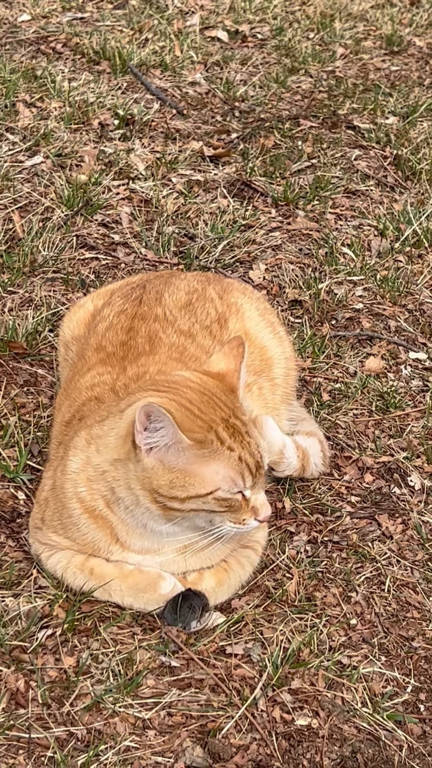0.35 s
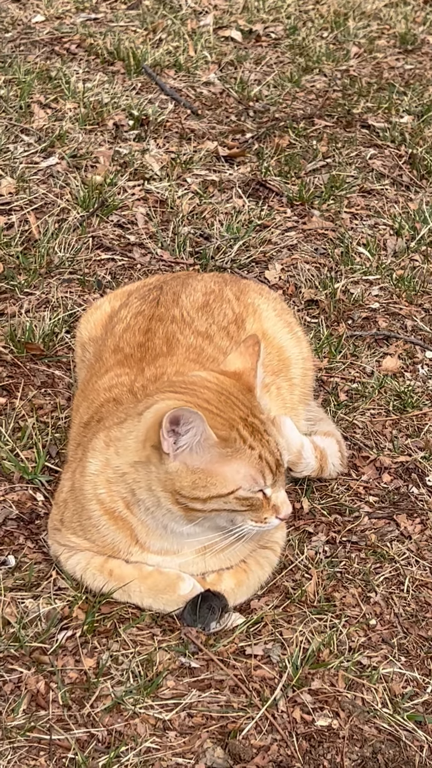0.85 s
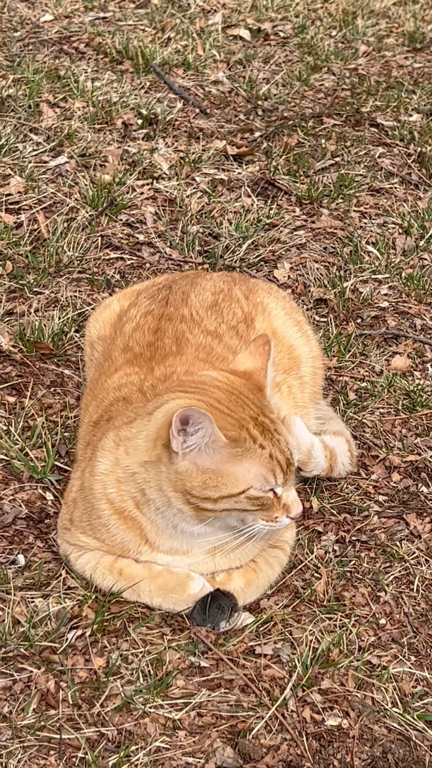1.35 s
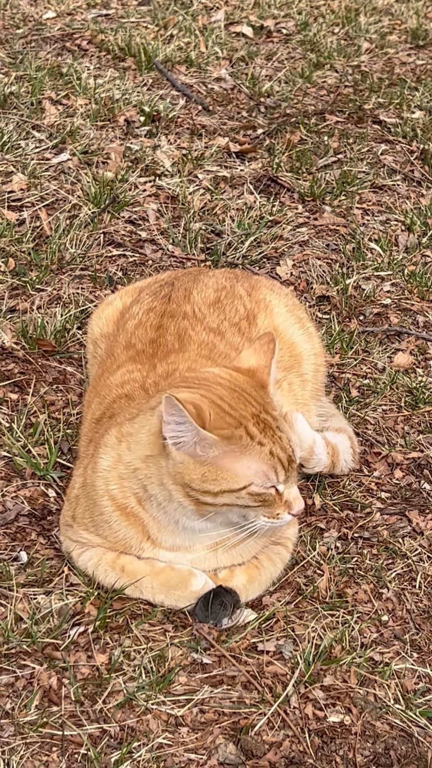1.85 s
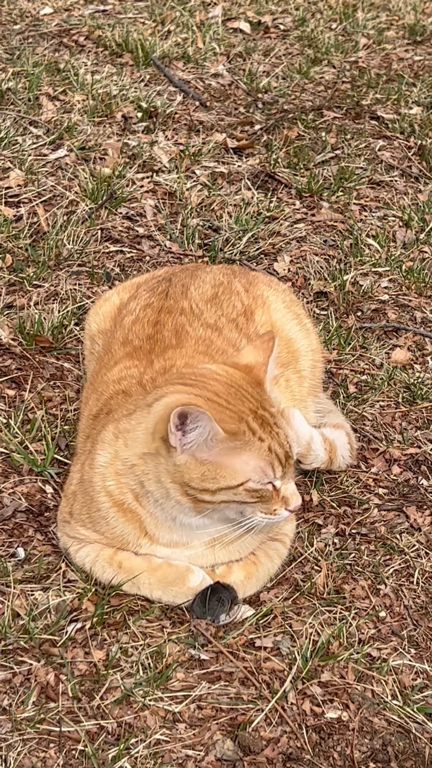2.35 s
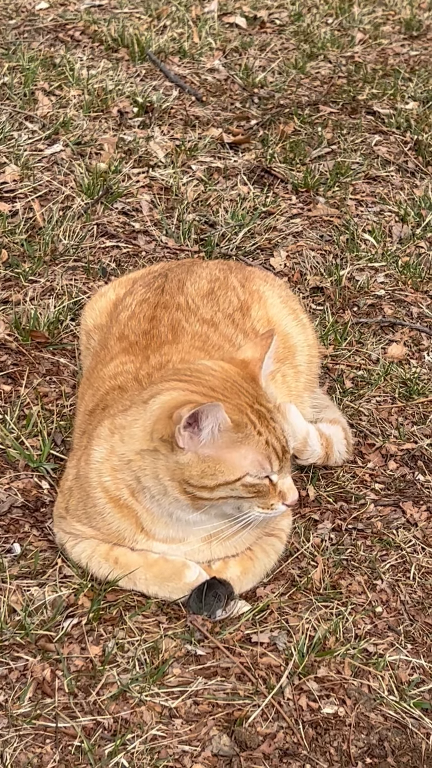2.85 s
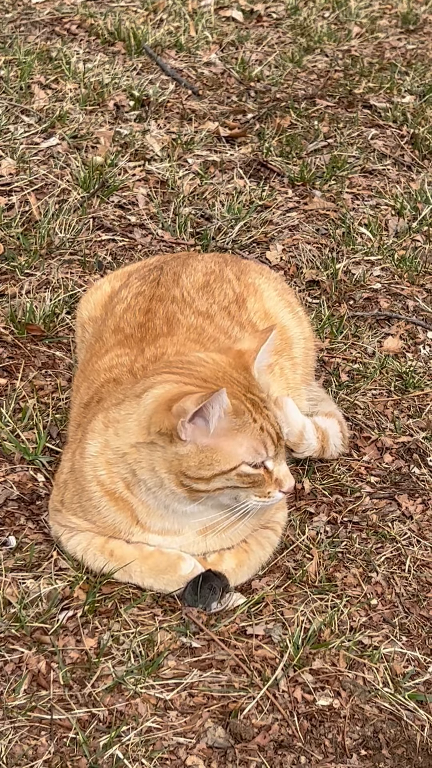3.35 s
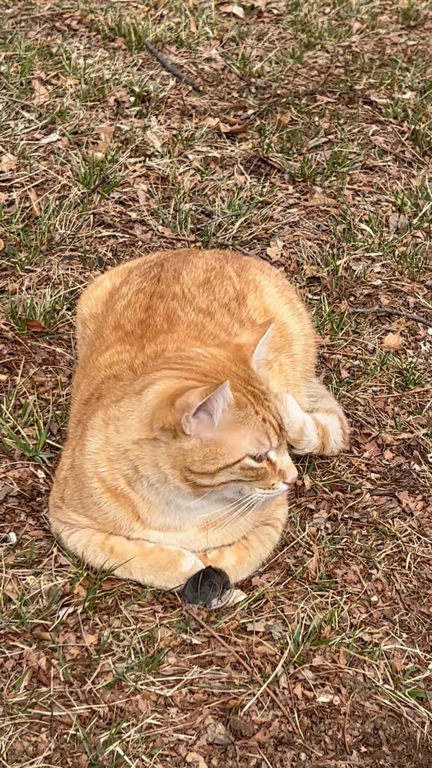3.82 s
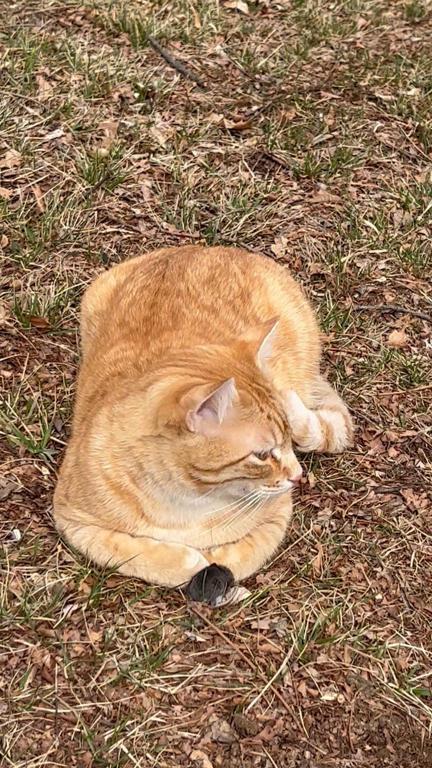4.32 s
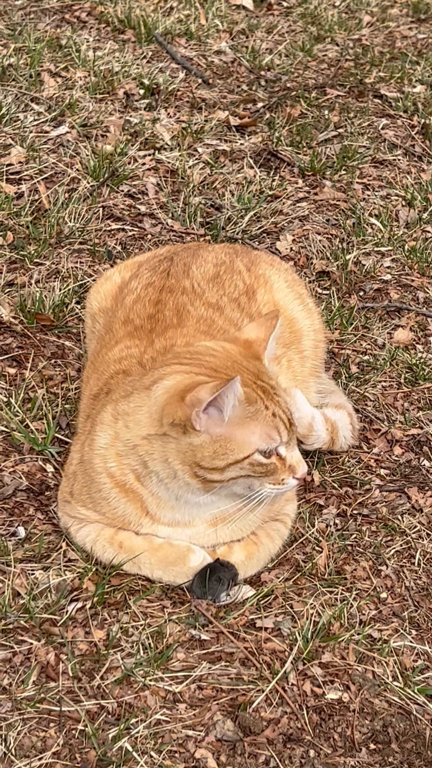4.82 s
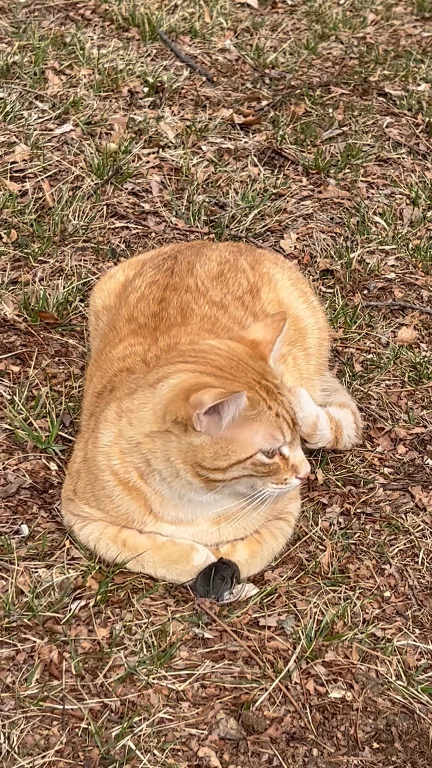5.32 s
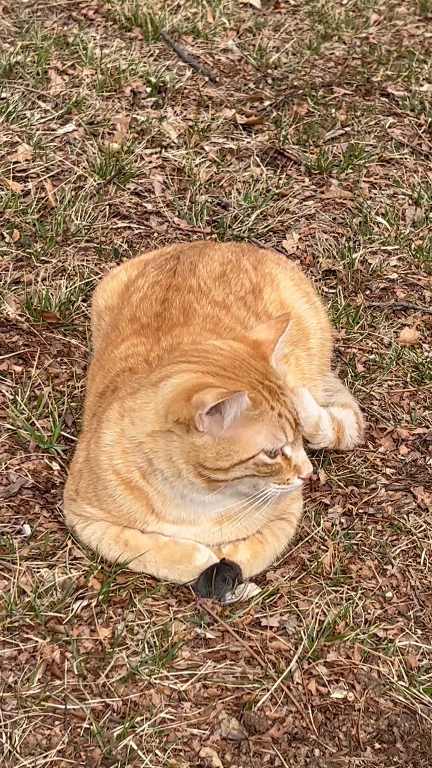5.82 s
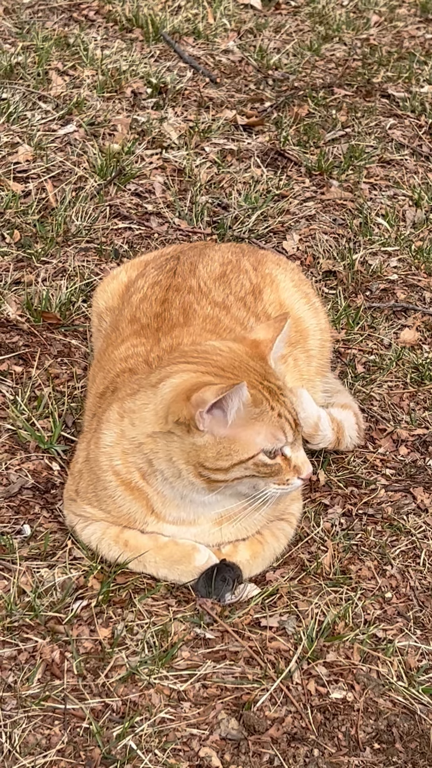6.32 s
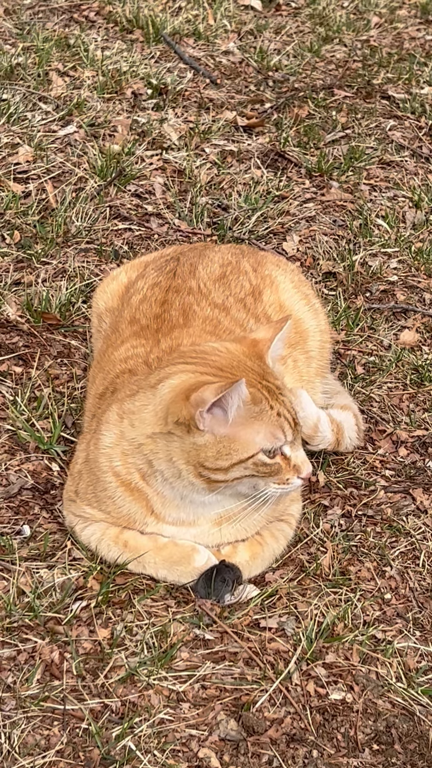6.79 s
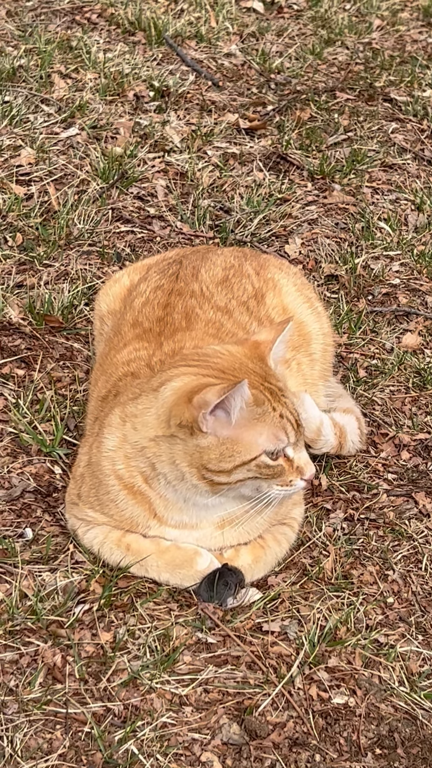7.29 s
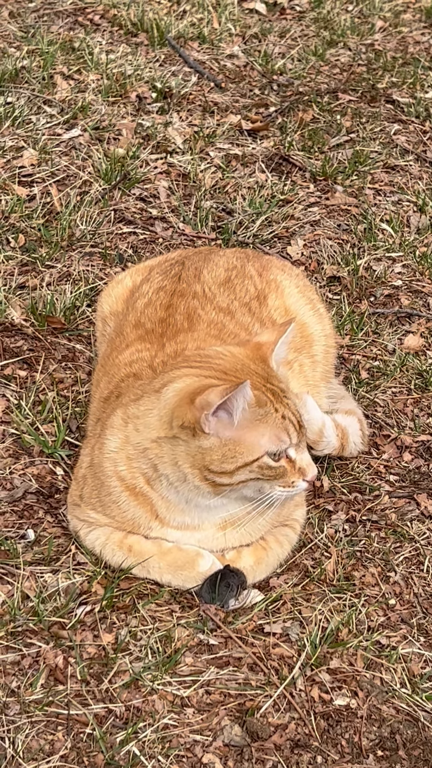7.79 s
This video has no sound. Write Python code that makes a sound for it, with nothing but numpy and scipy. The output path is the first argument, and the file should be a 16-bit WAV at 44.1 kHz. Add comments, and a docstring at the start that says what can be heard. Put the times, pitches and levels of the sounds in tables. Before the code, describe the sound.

Outdoors, hollow woodpecker drumming fades into distant chatter and whistles; a small bird warbles quickly with buzzy rasps above a steady deep traffic rumble.

```python
"""A woodpecker's roll on dry wood, already under way, over low traffic rumble; a second roll comes at the end.
A spring garden, a phone near the ground with two microphone ports. Close by, a small songbird twitters in
gliding near-sine whistles with a faint octave; rasps of fluttering noise and rough tone come high from it and
low from farther birds, which also whistle. A distant chorus churrs, dry rustles tick. The blows ring decaying
wood modes, traffic is filtered noise beside a faint whine, and noise tails echo birds and woodpecker."""
import sys
import numpy as np
from scipy import signal
from scipy.fft import rfft, irfft
from scipy.io import wavfile
from scipy.ndimage import uniform_filter1d

SR = 44100
rng = np.random.default_rng(int(sys.argv[2]) if len(sys.argv) > 2 else 0)


def nominal_scale(level):
    """Amplitude ratio for a level in decibels (scalar or array-like)."""
    x = np.asarray(level, float) / 20
    return 10 ** x


def waveform_to_disk(signal):
    """Save audio, clipped to [-1, 1], as 16-bit WAV at the path in sys.argv[1]."""
    frames = np.transpose(np.atleast_2d(signal))
    scaled = np.clip(frames, -1, 1) * 32767
    samples = np.round(scaled).astype(np.int16)
    wavfile.write(sys.argv[1], SR, samples)


N = 359856  # length [samples]


def colour(x, table):
    """Filter by (frequency [Hz], gain [dB]) points joined on a log-frequency axis."""
    hz, db = np.transpose(table)
    f = np.maximum(np.arange(N // 2 + 1) * SR / N, 1)
    return irfft(rfft(x) * nominal_scale(np.interp(np.log(f), np.log(hz), db)), N)


def unit(x):
    """Scale to rms 1."""
    return x / np.sqrt(np.mean(x ** 2))


def walk(rate):
    """Random levels held 1 / rate s and smoothed twice; spread near 1."""
    k = int(SR / rate)
    steps = np.repeat(rng.standard_normal(N // k + 1), k)
    return 1.5 * uniform_filter1d(uniform_filter1d(steps, k), k)[:N]


def tone_of(pitch):
    """Sine of amplitude 1 that follows a pitch [Hz] sample by sample."""
    return np.sin(2 * np.pi * np.cumsum(pitch) / SR)


# spacing of the two microphone ports: (frequency [Hz], phase by which the right port leads [radians])
PORT_LEAD = [(4500, 0.0071), (5200, 0.79), (6000, 1.26), (8000, 1.05), (13000, 1.8)]


def ports(x):
    """One sound at two microphone ports: the treble reaches the right one a little earlier."""
    hz, lead = np.transpose(PORT_LEAD)
    turn = np.exp(.5j * np.interp(np.arange(N // 2 + 1) * SR / N, hz, lead))
    taper = np.minimum(np.arange(N, 0, -1) / 200, 1)
    return irfft(rfft(x * taper) * np.array([1 / turn, turn]), N)


def echoes(x, t60, wet_db, gap=.012, dull_hz=6000):
    """Scattered reflections from trunks and walls: a decaying noise tail, duller than the direct sound."""
    t = np.arange(SR) / SR
    tail = rng.standard_normal(SR) * nominal_scale(-60 * t / t60) * (t > gap)
    lowpass = signal.butter(1, dull_hz, fs=SR, output="sos")
    tail = signal.sosfilt(lowpass, tail / np.sqrt(np.sum(tail ** 2)))
    wet = signal.fftconvolve(x, tail[None] if x.ndim > 1 else tail)[..., :N]
    return x + nominal_scale(wet_db) * wet


def whistles(notes, overtone_db, waver, flutter_db, throat_hz, edge=.003):
    """Near-sine syrinx tones with rounded bends, an unsteady pitch and level, and a faint octave."""
    out = np.zeros(N)
    drift = 1 + waver * walk(220)
    flutter = nominal_scale(flutter_db * (walk(130) + .4 * walk(400)))
    for note in notes:
        s, hz, db = np.transpose(note)
        i = np.arange(max(int((s[0] - edge) * SR), 0), min(int((s[-1] + edge) * SR), N))
        t = i / SR
        fade = np.clip(np.minimum(t - s[0], s[-1] - t) / edge + 1, 0, 1)
        pitch = uniform_filter1d(np.interp(t, s, hz), size=200, mode="nearest") * drift[i]
        phase = 2 * np.pi * np.cumsum(pitch) / SR
        gain = np.interp(t, s, nominal_scale(db))
        # louder notes are harsher; octaves above 11.5 kHz weaken
        harsh = (gain.max() / nominal_scale(-61.5)) ** 0.58 * nominal_scale(-2.5 * np.maximum(2 * pitch - 11500, 0) / 1000)
        # the octave escapes the throat filter, so it swells less than the note itself
        octave = nominal_scale(overtone_db) * harsh * np.sqrt(gain * gain.max()) * np.sin(2 * phase)
        # the throat passes little below its resonance, so the feet of the glides fade
        passed = nominal_scale(-14 * np.maximum(throat_hz - pitch, 0) / 1000)
        out[i] += np.sqrt(2) * fade * (gain * passed * flutter[i] * np.sin(phase) + octave)
    return out


def bursts(rows, buzz_hz, depth, voiced_hz):
    """Short notes of noise and a jumpy tone, chopped by a fast irregular flutter."""
    pure_hz, widening = 906, 0.474  # bandwidth = widening x (centre - pure_hz)
    out, noise, jump = np.zeros(N), rng.standard_normal(N), np.tanh(walk(110))
    flutter = 1 + depth * tone_of(buzz_hz * (1 + 0.25 * walk(40)))
    for s, length, hz, db in rows:
        width = max(widening * (hz - pure_hz), 100)
        i = np.arange(int(s * SR), int((s + length) * SR))
        edges = np.clip([hz - width / 2, hz + width / 2], 100, .45 * SR)
        band = signal.sosfilt(signal.butter(3, edges, "band", fs=SR, output="sos"), noise[i])
        # the narrower the note, the more of it is voiced
        tone = voiced_hz / width * tone_of(hz + 0.292 * width * jump[i])
        swell = np.sin(np.pi * np.arange(len(i)) / len(i)) ** 0.2
        out[i] += nominal_scale(db) * unit((unit(band) + tone) * flutter[i]) * swell
    return out


# distant traffic: (time [s], rumble level [dB], tyre hiss [dB], only its change counts)
TRAFFIC = [(0, -48, -76.5), (.8, -48.5, -75.5), (1.4, -49, -80.5), (4.2, -47.5, -77), (5.4, -48.5, -74),
           (7.2, -48.5, -74.5), (8.16, -47, -72)]
# spectrum of the open air, before scaling: (frequency [Hz], relative level [dB per Hz])
AIR = [(20, -34.5), (32, -23.5), (50, -3), (85, -1), (135, -9), (190, -18.5), (260, -25.5), (330, -34),
       (800, -40), (1050, -46), (2300, -57), (3600, -55.5), (4200, -61.5), (7000, -59), (9500, -65),
       (13600, -70.5)]
# share of the background that differs between the microphone ports: (frequency [Hz], share [0-1])
DIFFUSE = [(100, 0), (200, 0.14), (330, 0.67), (660, 0.81), (1200, 1), (5000, 0.1), (9000, .55),
           (13000, .85)]
# lean of the background to one port: (frequency [Hz], left minus right level [dB])
LEFT_LEAN = [(60, -0.07), (250, 2), (600, -0.6), (1200, -3.5), (2000, -0.1)]


def port_noise():
    """Air-coloured noise, partly shared by the ports and partly independent, by frequency."""
    f = np.arange(N // 2 + 1) * SR / N
    share_hz, shares = np.transpose(DIFFUSE)
    share = np.clip(np.interp(np.log(f + 1), np.log(share_hz), shares), 0, 1)
    common, apart = ports(rng.standard_normal(N)), rng.standard_normal((2, N))
    noise = colour(irfft(rfft(common) * np.sqrt(1 - share ** 2) + rfft(apart) * share, N), AIR)
    hz, lean_db = np.transpose(LEFT_LEAN)
    left = colour(noise[0], np.c_[hz, lean_db / 2])
    right = colour(noise[1], np.c_[hz, -lean_db / 2])
    return np.array([left, right])


def whine():
    """A faint steady whine: a sine whose pitch and level waver a little."""
    return np.sqrt(2) * nominal_scale(-95.5 + 2.6 * walk(30)) * tone_of(3690 + 5 * walk(25))


def background():
    """Distant traffic and air: low noise for the rumble, higher noise for swelling tyre hiss, and the whine."""
    s, rumble_db, hiss_db = np.transpose(TRAFFIC)
    t = np.arange(N) / SR
    noise = port_noise()
    low = signal.sosfiltfilt(signal.butter(4, 280, fs=SR, output="sos"), noise)
    scale = np.sqrt(np.mean(low ** 2))
    # tyre hiss rises and falls, most of all around 850 Hz
    swell = nominal_scale(np.interp(t, s, hiss_db) - np.interp(2.8, s, hiss_db) + 1.24 * walk(9)) - 1
    tyre_band = signal.butter(1, [520, 1400], "band", fs=SR, output="sos")
    tyres = signal.sosfiltfilt(tyre_band, noise - low)
    upper = (noise - low + swell * tyres) * nominal_scale(-48.0 + 0.92 * walk(2.914))
    return (low * nominal_scale(np.interp(t, s, rumble_db)) + upper) / scale + whine()


# distant chatter of many birds: (time [s], level [dB])
CHURR = [(.25, -86.5), (.56, -79.5), (.9, -79), (1.3, -83.5), (1.45, -93.5), (3.2, -101), (3.5, -94),
         (4.0, -92.5), (4.7, -93), (5.0, -101), (5.7, -110), (6.2, -84.5), (6.45, -92.5), (6.62, -85),
         (6.95, -91), (7.45, -84), (7.9, -92)]


def churr(voices=10):
    """Far birds chattering: hoarse trills, beating at random, whose pitches drop from a common top."""
    s, db = np.transpose(CHURR)
    top_hz = 3000 + 15 * (db + 85)  # louder chatter is higher
    t, out = np.arange(N) / SR, 0
    for _ in range(voices):
        pitch = np.interp(t, s, top_hz) * np.exp(.03 - .24 * np.abs(walk(80)))
        beats = np.maximum(walk(60) - .5, 0)
        out = out + beats * tone_of(pitch)
    return unit(out) * nominal_scale(np.interp(t, s, db, left=-200))


# faint dry rustles: (start [s], length [s], centre frequency [Hz], level [dB])
RUSTLES = [(0.9, 0.02, 10000, -86), (1.29, 0.028, 9900, -80.5), (1.51, 0.023, 10100, -83.5),
           (2.19, 0.02, 7500, -88), (7.92, .012, 8500, -84)]


def rustles():
    """Dry ticks of band noise with a deep flutter and no tone."""
    return bursts(RUSTLES, buzz_hz=290, depth=0.78, voiced_hz=0)


# woodpecker rolls: (start [s], level [dB])
ROLLS = [(-.0585, -55), (7.881, -53.5)]


def drumming():
    """Times and levels of each roll's blows: gaps lengthen after a hurried start, early blows are weaker."""
    k = np.arange(15)
    gaps = .0627 + .00055 * k - .011 * .6 ** k  # [s]
    after = np.cumsum(np.r_[0, gaps])[:-1]
    growth_db = -9 * 0.43 ** k + 0.2327 * k
    rows = [(s + a, db + d) for s, db in ROLLS for a, d in zip(after, growth_db)]
    return [row for row in rows if row[0] < N / SR]


# modes of the dry trunk: (frequency [Hz], level re blow [dB], t60 [s], phase by which the left port
# leads [radians], left minus right level [dB])
TRUNK = [(1072, -8.5, 0.16, 1.6, -4), (1114.6, -6, .09, 1.1, -5), (1187, -5.5, 0.043, 2.8, -11.5),
         (1359, 0.5, 0.072, 1.6, -1), (1517, 0, 0.04, .01, -4.5), (1617, -2.5, 0.035, 0.011, -1),
         (1920, -11.5, 0.031, .01, 1), (2367, -16.5, 0.067, .01, -4)]
# returns from nearby trunks: (delay [s], level re direct [dB])
TRUNK_ECHOES = [(.015, -8.5), (.022, -11), (.05, -14)]


def woodpecker():
    """Each beak blow rings the same wood modes, a little differently, then comes back from nearby trunks."""
    out, t = np.zeros((2, N + SR)), np.arange(SR // 4) / SR
    hz, db, t60, lead, pan_db = np.array(TRUNK).T[:, :, None]
    blows = drumming()
    chance = rng.standard_normal((len(blows), 2, len(TRUNK), 1))
    for (s, blow_db), (size, detune) in zip(blows, chance):
        ring = nominal_scale(blow_db + db + 1.3 * size - 60 * t / t60) * np.minimum(t / 0.0011, 1)
        phase = 2 * np.pi * hz * (1 + 0.0051 * detune) * t
        first = int(s * SR)  # negative for blows struck before the start
        for port, sign in enumerate((.5, -.5)):
            wave = nominal_scale(sign * pan_db) * ring * np.sin(phase + sign * lead)
            out[port, max(first, 0):first + len(t)] += wave.sum(0)[max(-first, 0):]
    near = out + sum(nominal_scale(echo_db) * np.roll(out, int(lag * SR), axis=1) for lag, echo_db in TRUNK_ECHOES)
    return echoes(near[:, :N], 1.26, -2, dull_hz=1195)


# a farther bird's tune, a long note, a fall and a hook:
# (time after its start before stretching [s], pitch [Hz], level re the tune's [dB])
TUNE = [
    [(0, 2435, -22), (.022, 2358, -2), (.065, 2365, .5), (.102, 2358, -1), (.117, 2345, -20)],
    [(.136, 2450, -13), (.155, 2277, -0.5), (.173, 2125, -15)],
    [(.192, 2390, -16), (.207, 2275, -5.5), (.222, 2195, -7), (.262, 2138, -14.5)],
]


def tune(s, db, stretch):
    """The same three notes each time, at their own pace and level."""
    return [[(s + stretch * after, hz, db + rel_db) for after, hz, rel_db in part] for part in TUNE]


def slide(s, length, first_hz, last_hz, db):
    """A straight glide that swells and fades."""
    peak = 0.44  # loudest at this share of the length
    return [(s, first_hz, db - 12.5),
            (s + peak * length, first_hz + peak * (last_hz - first_hz), db),
            (s + length, last_hz, db - 8)]


# times the tune is sung: (start [s], level [dB], stretch [ratio])
TUNES = [(1.535, -60, 1.01), (1.935, -63.5, 1.04)]
# single slides of other far birds: (start [s], length [s], first pitch [Hz], last pitch [Hz], peak level [dB])
SLIDES = [(0.538, 0.36, 2980, 2960, -79.5), (1.22, 0.018, 2910, 2850, -75),
          (1.32, 0.027, 2720, 2970, -72.5), (3.371, 0.22, 1900, 2740, -86.5),
          (4.193, 0.14, 2220, 1760, -82), (4.722, .06, 3020, 2720, -83), (4.78, .055, 2710, 2420, -74),
          (5.263, .035, 3600, 3230, -83), (4.821, 0.022, 1485, 1610, -73.5),
          (4.875, 0.057, 2170, 1830, -72), (5.135, .016, 2100, 2330, -72.5), (5.366, .025, 2770, 2490, -76),
          (5.387, .035, 2510, 2420, -72), (5.477, 0.072, 2040, 1770, -77),
          (5.593, 0.015, 2670, 2000, -63.5), (5.755, 0.02, 2420, 2050, -75),
          (5.822, 0.024, 2190, 1700, -78), (5.984, .016, 2200, 1800, -79), (6.077, 0.03, 2490, 2050, -62.5),
          (6.141, 0.026, 3000, 3110, -67), (7.466, 0.011, 2640, 2780, -69),
          (7.752, 0.046, 2810, 2250, -67.5)]


def far_birds():
    """Farther birds: syrinx whistles in single slides and a repeated tune, with hardly any octave."""
    notes = [slide(*row) for row in SLIDES]
    for row in TUNES:
        notes = notes + tune(*row)
    return whistles(notes, overtone_db=-44, waver=.002, flutter_db=1.4, throat_hz=1400)


# rasping notes, the high ones from the near bird, the low ones from farther birds:
# (start [s], length [s], centre frequency [Hz], level [dB])
RASPS = [(2.58, 0.077, 2075, -84.5), (3.4, 0.13, 1486, -81.5), (4.54, 0.031, 7400, -77),
         (4.665, 0.027, 6460, -78), (4.668, 0.036, 2410, -74), (4.675, .03, 3600, -78.5),
         (4.685, 0.027, 1526, -78), (5.105, .03, 2350, -79), (5.105, 0.028, 8160, -76),
         (5.105, 0.023, 1490, -77), (5.41, 0.043, 5380, -80), (5.42, 0.032, 2930, -75),
         (5.43, 0.034, 8500, -74.5), (5.585, 0.017, 6550, -76), (5.852, 0.025, 7660, -78),
         (6.11, 0.037, 2430, -67.5), (6.115, 0.022, 7500, -74), (6.268, 0.038, 5290, -68),
         (6.558, 0.0039, 7400, -70.5), (6.725, 0.083, 2253, -73.5), (6.79, 0.043, 3800, -76.5),
         (7.12, 0.042, 1765, -72.5), (7.14, 0.089, 2520, -73.5), (7.293, 0.046, 2390, -67.5),
         (7.297, 0.031, 1706, -70), (7.345, 0.026, 4210, -69.5), (7.445, 0.017, 7500, -79),
         (7.465, 0.027, 3300, -76.5), (7.45, 0.033, 1704, -74.5), (7.57, 0.076, 2170, -75.5),
         (7.718, 0.03, 2505, -69.5), (7.725, 0.066, 1725, -73.5)]


def rasps():
    """Buzzy notes of fluttering noise and rough tone, near and farther birds alike."""
    return bursts(RASPS, buzz_hz=117.8, depth=0.32, voiced_hz=810)


def note(s, length, onset_hz, held_hz, end_hz, db):
    """Slide in, hold while the level sags, slide out; wider slides take longer."""
    slides_hz = np.abs([held_hz - onset_hz, held_hz - end_hz])
    # 75000 Hz/s, and at least 5 ms where the note is long enough
    up, down = np.minimum(slides_hz / 75000 + .005, [.55 * length, .3 * length])
    onset_db = -8.5
    tired_db = db - 40 * length  # sags 40 dB/s
    return [(s, onset_hz, db + onset_db),
            # the slide rounds off near the held pitch, which bows upward
            (s + 0.49 * up, onset_hz + .72 * (held_hz - onset_hz), db + onset_db / 2),
            (s + up, held_hz, db),
            (s + (up + length - down) / 2, held_hz * (1 + .012), (db + tired_db) / 2 - 2.5),
            (s + length - down, held_hz, tired_db),
            (s + length, end_hz, tired_db - 4.5)]


# near songbird, plain notes: (start [s], length [s], onset pitch [Hz], held pitch [Hz], end pitch [Hz],
# level before the throat [dB])
NOTES = [(3.253, .05, 7400, 7830, 7000, -74), (3.47, .018, 6400, 6300, 5600, -72),
         (3.484, .02, 7340, 6870, 6750, -79), (3.506, 0.086, 5970, 6250, 6440, -71.5),
         (3.701, .082, 6560, 7840, 7700, -76), (3.998, 0.14, 7370, 7880, 7560, -77),
         (4.333, .018, 5160, 5560, 5500, -64), (4.345, 0.13, 5416, 7830, 7760, -71.5),
         (4.493, 0.08, 5900, 7030, 7300, -71.5), (5.11, 0.029, 8800, 4980, 4810, -72.5),
         (6.187, 0.021, 3710, 5400, 5500, -59.5), (6.213, .014, 6900, 6200, 6060, -70),
         (6.227, .04, 5480, 5190, 4420, -59.5), (6.744, 0.017, 4780, 4620, 4470, -72),
         (6.764, 0.014, 4520, 4560, 4580, -74), (6.81, .016, 4550, 4640, 4780, -76),
         (6.844, 0.017, 4670, 5085, 5050, -60.5), (6.883, .034, 5500, 5720, 4920, -68),
         (8.119, .04, 4630, 4780, 4940, -83)]
# its warbles, whose pitch and level bend freely, one list each:
# (time [s], pitch [Hz], level before the throat [dB])
WARBLES = [
    [(3.312, 6290, -81.5), (3.322, 5810, -71), (3.36, 6020, -78), (3.378, 5770, -84), (3.42, 5860, -77),
     (3.444, 4960, -72.5), (3.468, 5120, -80)],
    [(4.128, 6140, -75.5), (4.15, 5450, -79), (4.17, 5700, -70.5), (4.208, 5620, -75), (4.219, 5250, -68.5),
     (4.23, 5650, -74.5), (4.29, 5600, -94)],
    [(4.436, 6310, -78.5), (4.446, 5280, -66.5), (4.468, 5600, -65), (4.484, 6100, -60.5),
     (4.496, 6150, -67)],
    [(4.573, 6010, -69), (4.599, 5490, -74), (4.627, 5860, -72.5), (4.653, 5530, -63.5),
     (4.671, 5190, -62.5)],
    [(5.151, 4600, -71), (5.169, 5630, -73), (5.203, 5890, -64), (5.261, 5670, -65), (5.309, 6180, -64),
     (5.335, 5790, -69.5), (5.389, 6020, -64), (5.409, 5100, -68), (5.415, 4390, -90)],
    [(5.452, 3880, -85), (5.47, 5200, -65), (5.5, 6120, -63.5), (5.554, 5980, -63.5), (5.578, 5760, -80),
     (5.596, 4870, -74)],
    [(5.77, 6000, -86), (5.79, 7560, -69.5), (5.814, 8060, -65), (5.846, 8030, -65), (5.856, 7330, -60),
     (5.866, 7360, -76), (5.878, 5870, -68), (5.94, 5490, -65), (6.022, 5310, -62.5), (6.044, 5060, -64),
     (6.058, 4170, -69)],
    [(7.212, 4380, -74), (7.218, 4800, -66), (7.226, 5100, -61), (7.24, 5330, -66.5), (7.262, 5310, -71),
     (7.284, 4890, -83)],
    [(7.368, 3700, -75), (7.382, 4860, -59), (7.416, 5630, -73), (7.426, 5700, -82), (7.44, 5670, -62),
     (7.452, 5330, -67)],
    [(7.622, 3890, -59.5), (7.632, 5200, -67), (7.642, 6280, -62), (7.662, 7270, -70), (7.694, 7550, -70),
     (7.706, 5620, -64.5), (7.712, 5400, -62), (7.718, 4650, -75)],
]


def songbird():
    """The bird close by: high gliding syrinx whistles, plain notes and warbles, with a faint octave."""
    notes = [note(*row) for row in NOTES] + WARBLES
    return whistles(notes, overtone_db=-20, waver=.006, flutter_db=2.5, throat_hz=4780)


def scene():
    """Every bird with its echoes, the rustles dry, the woodpecker and the background."""
    near = echoes(songbird() + rasps(), 0.47, -4, gap=0.0046)
    far = echoes(far_birds(), .6, -13.5, gap=0.0072)
    chatter = echoes(churr(), 0.43, 1.1)
    return ports(near + far + chatter + rustles()) + woodpecker() + background()


def roll_off(x):
    """The treble ends steeply here."""
    return signal.sosfilt(signal.butter(12, 13760, fs=SR, output="sos"), x)


# band in which the phone narrows the stereo: (lower edge [Hz], upper edge [Hz])
MERGED_HZ = (1730, 4520)


def record(dry):
    """The sound closes with a very short fade; the phone lowers a middle band's left-right difference 12 dB."""
    dry = dry * np.minimum(np.arange(N, 0, -1) / 300, 1)
    mid, side = dry.mean(0), rfft(dry[0] - dry[1]) / 2
    f = np.arange(len(side)) * SR / N
    merged = (f > MERGED_HZ[0]) & (f < MERGED_HZ[1])
    side = irfft(side * np.where(merged, nominal_scale(-12), 1), N)
    mix = np.array([mid + side, mid - side])
    return roll_off(mix)


dry = scene()
out = record(dry)
waveform_to_disk(out)
```